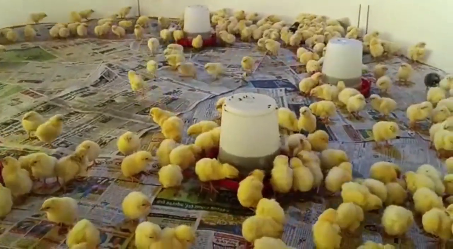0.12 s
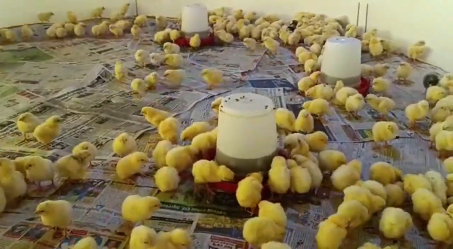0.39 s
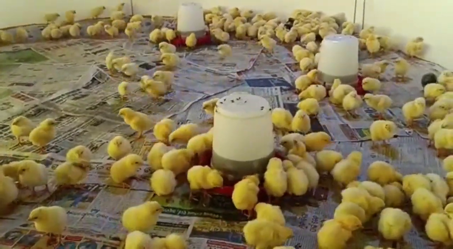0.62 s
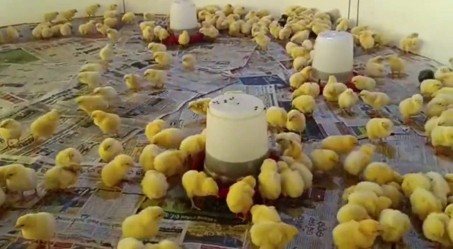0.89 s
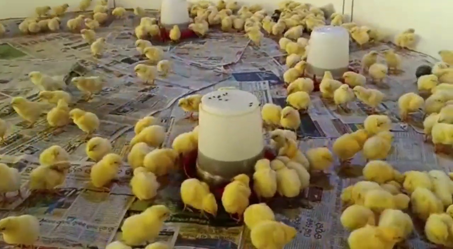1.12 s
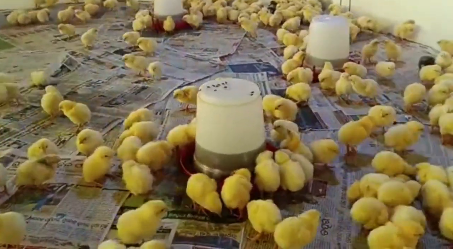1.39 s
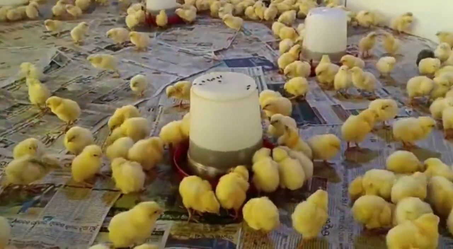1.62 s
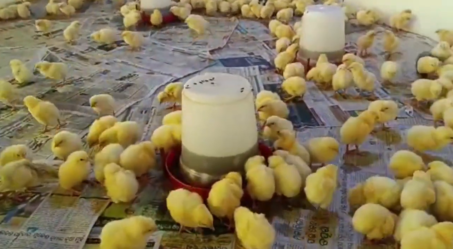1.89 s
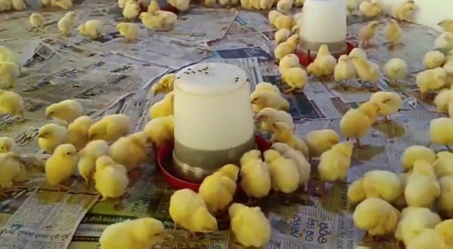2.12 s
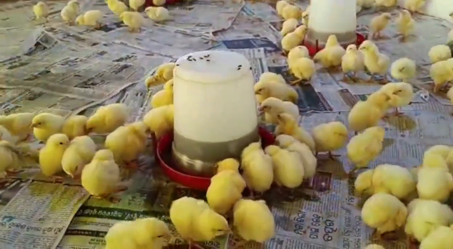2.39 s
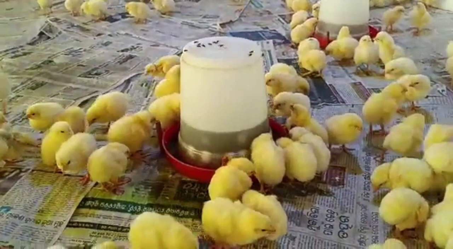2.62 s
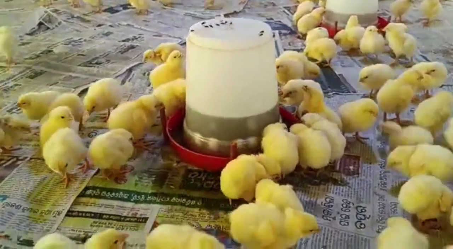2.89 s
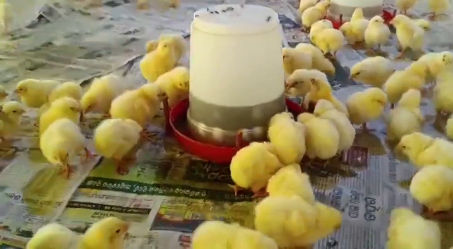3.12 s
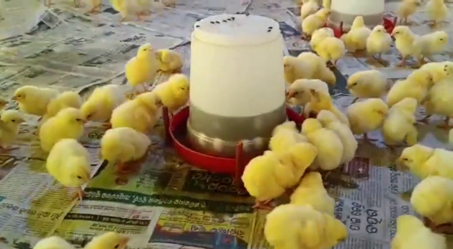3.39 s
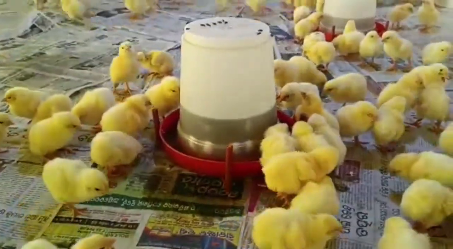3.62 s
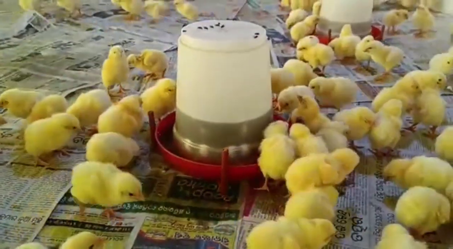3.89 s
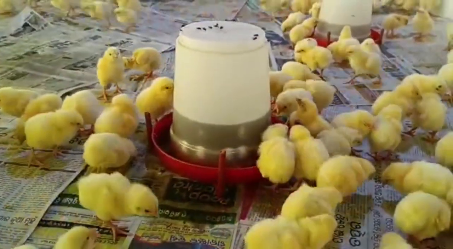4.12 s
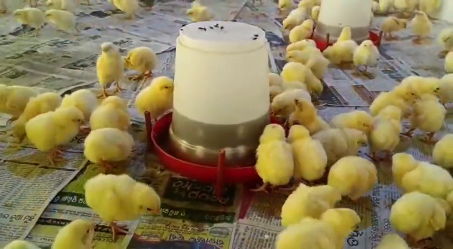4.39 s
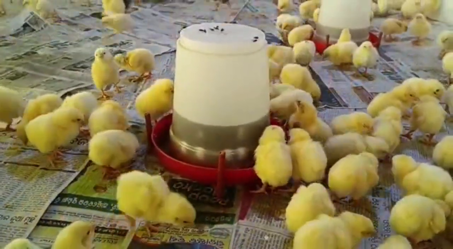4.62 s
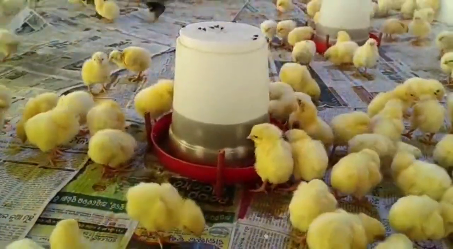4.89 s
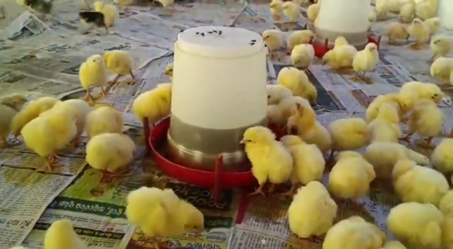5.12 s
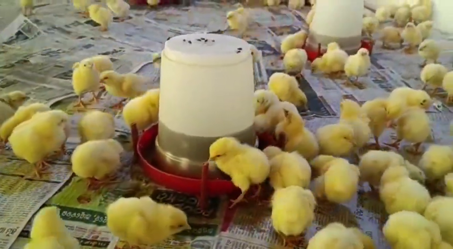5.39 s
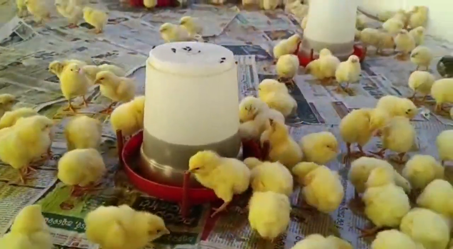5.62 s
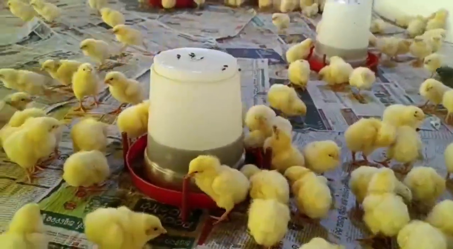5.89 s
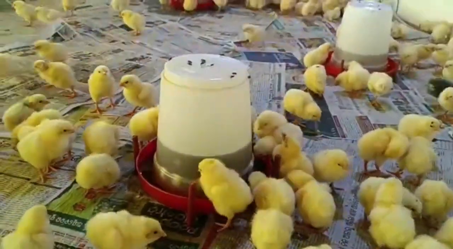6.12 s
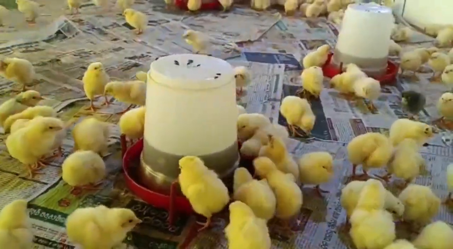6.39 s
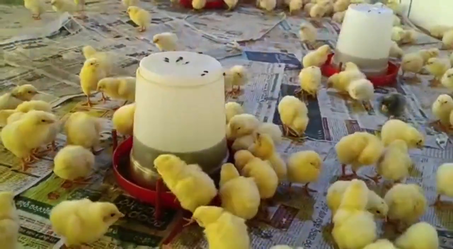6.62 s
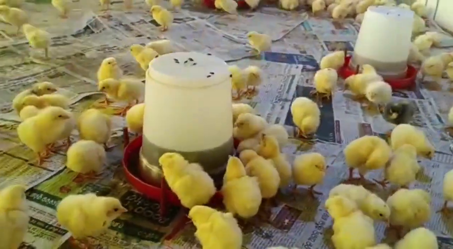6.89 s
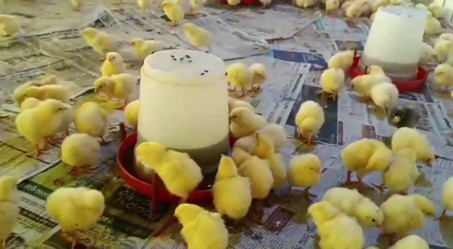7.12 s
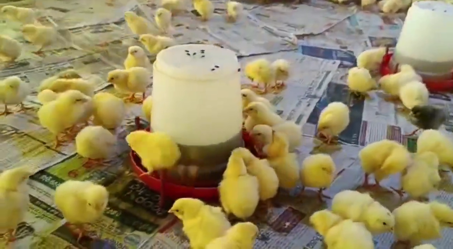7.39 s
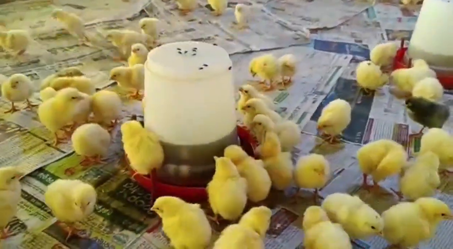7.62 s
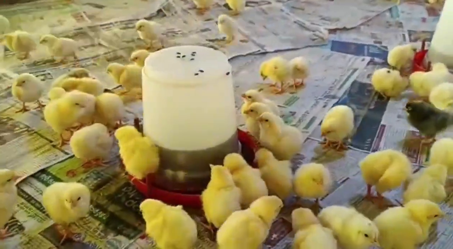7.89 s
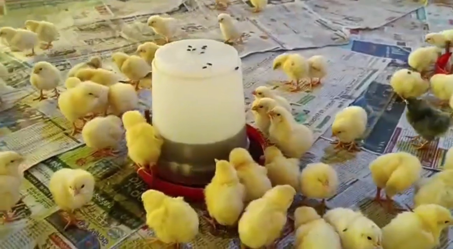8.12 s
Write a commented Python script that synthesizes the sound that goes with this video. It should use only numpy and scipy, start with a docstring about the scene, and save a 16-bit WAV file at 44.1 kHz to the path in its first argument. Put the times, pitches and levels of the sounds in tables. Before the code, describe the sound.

From 0 to about 8.3 seconds, hundreds of young chicks peep without pause in a bare shed. The far flock is a dense, bright, high whistling chorus, blurred by about half a second of reverberation, nearly constant in level. Over it, near birds pipe several times a second: tiny pure whistles, about a tenth of a second, gliding then falling steeply, some lower and shriller. A sharp loud chirp stands out left at 0.25; strong peeps follow around 0.6, 1.4, 2.0, 2.2, 3.6, 5.7 and 6.2, the last well to the right, with more left-side calls after 7.5. Feet patter in flickering papery bursts throughout. Small plastic beak taps come near 1.3, 2.7, 4.5, 6.3 and, clearest, 7.3. Faint low camera bumps occur near 1.75 and 3.5. The close stereo microphones favor peeps on the right; loud calls momentarily duck the rest. It stops mid-chorus.

```python
"""Hundreds of day-old chicks peep at once on a paper-covered floor in a bare shed.
Each peep is a near-sine whistle that glides slowly, then drops steeply, with weak harmonics; near birds
stand out of a chorus blurred by random echoes. Shaped noise and pulses give feet pattering on the paper,
damped sines give beak taps on a plastic feeder and soft bumps on the camera body.
The stereo microphones lean right for the peeps, and gain control ducks everything under loud birds."""
import sys
import numpy as np
from scipy import signal
from scipy.fft import rfft, irfft
from scipy.io import wavfile
from scipy.ndimage import uniform_filter1d, minimum_filter1d

SR = 44100
rng = np.random.default_rng(int(sys.argv[2]) if len(sys.argv) > 2 else 0)


def file_out(sig):
    """Save sig as 16-bit WAV at sys.argv[1]."""
    # one column per channel
    cols = np.atleast_2d(sig).T
    # limit, then scale
    lim = np.clip(cols, -1, 1)
    pcm = np.round(lim * 32767).astype(np.int16)
    wavfile.write(sys.argv[1], SR, pcm)


def convert_level_to_amplitude(level_db):
    """Map a level in decibels to its linear amplitude factor."""
    exponent = np.asarray(level_db, float) / 20
    return 10 ** exponent


N = 364266  # samples

# How strongly throat and beak pass each pitch. Each row: frequency in Hz, gain in dB.
BEAK_GAIN = [(2000, -9.5), (2600, -1.5), (3300, 0.5), (3900, 3.5), (4400, -1.5), (4900, -28), (5400, 5),
             (6300, 1), (7200, -12), (9000, -7.5), (11000, -6), (14000, -7)]


def evened(x):
    """Normalises by the root mean square, so that the mean power is 1."""
    return x / np.sqrt(np.mean(x ** 2) + 1e-20)


def read(points, hz):
    """Interpolates a spectrum along logarithmic frequency, as pitch is heard."""
    f, value = np.transpose(points)
    return np.interp(np.log(hz + 1), np.log(f + 1), value)


def add(mix, s, sound, pan_db=0, lag=0):
    """Places a source by interaural level and delay: the left port hears it lag samples later."""
    for side, shift, sign in ((mix[0], lag, 1), (mix[1], 0, -1)):
        at = round(s * SR) + int(shift)
        part = side[max(at, 0):max(at + len(sound), 0)]
        heard = sound[max(-at, 0):][:len(part)]
        part += convert_level_to_amplitude(sign * pan_db / 2) / np.sqrt(2) * heard


def peep(held, first_hz, knee_hz, drop, octave_db, luck):
    """Frequency-modulated harmonics through a resonant filter: a slow glide, then a steep fall."""
    t = np.arange(-held, drop, 1 / SR)  # zero where the fall begins
    falling = np.maximum(t, 0) / drop
    glide_hz = (knee_hz - first_hz) * np.minimum(t, 0) / held
    hz = knee_hz + glide_hz - 0.35 * knee_hz * falling ** 1.7
    hz = uniform_filter1d(hz, size=500, mode="nearest")  # the knee is round
    # the tiny voice is unsteady in pitch and force
    quiver = np.sin(2 * np.pi * ((25 + 50 * luck[2]) * t + luck[3]))
    quiver += np.sin(2 * np.pi * ((11 + 20 * luck[3]) * t + luck[2]))
    hz = hz * (1 + 0.0032 * quiver)
    phase = 2 * np.pi * (np.cumsum(hz) / SR + luck[0])
    strain_db = 7 * np.minimum(3 * falling, 1) - 4  # overtones grow as the note breaks off
    twelfth_db = -41 + 14 * luck[1] ** 2
    tone = convert_level_to_amplitude(read(BEAK_GAIN, hz) - read(BEAK_GAIN, knee_hz)) * np.sin(phase)
    tone += convert_level_to_amplitude(octave_db + strain_db + read(BEAK_GAIN, 2 * hz)) * np.sin(2 * phase)
    tone += convert_level_to_amplitude(twelfth_db + 2 * strain_db + read(BEAK_GAIN, 3 * hz)) * np.sin(3 * phase)
    rise = np.clip((t + held) / 0.014, 0, 1)
    fade = np.clip((drop - t) / (0.27 * drop), 0, 1)
    return tone * convert_level_to_amplitude(1.5 * quiver) * np.sin(np.pi / 2 * rise * fade) ** 2


def near_birds():
    """Direct sound localised by level and arrival time: the louder port hears a bird first."""
    # Peeps that sag, then drop. Each row: start of the drop in seconds, held time in seconds,
    # pitch before the drop in Hz, drop time in seconds, whistle level in dB, left minus right in dB.
    sagging = [(.06, 0.063, 4270, 0.066, -17.5, -2), (0.257, 0.021, 3490, 0.0069, -1.5, 10.5),
               (0.477, 0.078, 3960, .063, -19, -2.5), (.51, .05, 4140, .06, -15, 4),
               (.62, 0.027, 3690, 0.042, -9.5, 3.5), (.775, 0.065, 3560, 0.012, -12, 3.5),
               (.955, .122, 3904, 0.03, -14.5, -1), (.885, 0.044, 4050, .03, -18, 2),
               (2.065, 0.024, 4600, .06, -25, 3), (1.019, .039, 3970, 0.082, -17, -3),
               (1.245, 0.049, 4230, .051, -18, 0.5), (1.337, .031, 3500, 0.057, -16, 5),
               (1.867, .074, 3570, 0.021, -18, .5), (1.996, 0.14, 3728, 0.023, -8.5, 4.5),
               (2.397, 0.02, 3810, 0.037, -17, -6), (2.576, 0.053, 2890, 0.04, -16.5, -0.5),
               (2.665, .05, 3720, .04, -12, 1), (2.757, 0.063, 3890, 0.033, -11, 2.5),
               (2.808, .02, 4340, 0.089, -18, 11.5), (2.981, 0.027, 3800, 0.056, -13, 10),
               (3.098, .079, 2950, 0.058, -19, -4), (3.15, 0.02, 3950, 0.052, -15, 11.5),
               (3.173, 0.047, 3940, 0.076, -15.5, 4), (3.261, 0.049, 2950, 0.039, -22, 4.5),
               (3.265, .055, 4080, 0.05, -11, -2), (3.42, .06, 2950, .09, -21.5, -6.5),
               (3.583, 0.085, 3670, 0.027, -9.5, 3.5), (3.54, .09, 4160, 0.025, -18.5, -2),
               (3.67, 0.061, 3200, 0.061, -17.5, 2), (3.862, .04, 3886, 0.039, -16, -5.5),
               (4.011, .033, 4020, 0.11, -14.5, 4.5), (4.113, 0.13, 4110, .069, -16.5, -1),
               (4.26, 0.038, 4110, 0.039, -15, -0.5), (4.405, 0.026, 4110, .098, -11.5, 0),
               (4.633, .075, 4070, 0.038, -13, 3.5), (4.858, 0.14, 3705, 0.023, -21, -6),
               (4.903, 0.047, 3660, 0.019, -14, 3), (5.101, 0.16, 3710, 0.11, -16, 3.5),
               (5.5, 0.017, 2850, 0.064, -20.5, -3.5), (5.525, .119, 3827, 0.091, -16.5, -3.5),
               (5.567, .023, 4070, .039, -26, -1), (5.46, .012, 2900, 0.054, -17.5, -2.5),
               (5.569, 0.048, 3400, 0.059, -22, -1), (3.6, .02, 2900, 0.041, -25.5, -7),
               (5.896, 0.056, 2943, 0.06, -19.5, -3.5), (6.031, 0.057, 3590, 0.11, -19.5, 1.5),
               (6.344, 0.052, 3215, 0.024, -14, -9), (6.387, 0.12, 4000, 0.022, -14.5, 9.5),
               (6.689, 0.071, 3050, 0.041, -15, 3), (6.737, 0.061, 4190, .07, -20.5, 5.5),
               (7.002, .021, 3870, 0.066, -12, 4.5), (7.299, 0.055, 3880, 0.026, -15, 6),
               (7.44, .05, 4100, .05, -11, 4.5), (7.564, .035, 3050, 0.059, -22, 12),
               (7.573, .08, 3590, .03, -13.5, 10.5), (7.924, .085, 3857, 0.035, -14.5, 10),
               (8.13, .015, 3800, .05, -15, 3)]
    # Peeps that climb a little, then drop. Each row: start of the drop in seconds, held time in seconds,
    # pitch before the drop in Hz, drop time in seconds, whistle level in dB, left minus right in dB.
    arched = [(.195, 0.032, 3864, 0.09, -9.5, -4), (1.448, 0.073, 3960, 0.058, -7.5, 4),
              (2.08, .046, 3740, 0.062, -18.5, 5), (2.202, 0.025, 3904, 0.052, -8, -5),
              (2.444, 0.048, 4390, 0.069, -14.5, 2.5), (3.071, 0.094, 4215, 0.077, -16, -2),
              (3.475, .01, 2900, 0.039, -17.5, -2), (3.48, 0.011, 3600, 0.049, -17, -7),
              (4.08, 0.06, 4160, 0.026, -13.5, 2), (4.686, 0.073, 3824, 0.068, -18.5, -2),
              (4.943, .01, 4135, 0.094, -18, 6), (5.238, 0.037, 3934, 0.071, -19, -2),
              (5.736, 0.067, 4170, 0.057, -9, -5), (6.192, 0.078, 4400, 0.058, -10, -10),
              (6.332, 0.012, 3170, 0.047, -10.5, -7), (6.58, .08, 4176, 0.062, -10, -0.5),
              (6.857, 0.021, 3850, 0.047, -13, 10.5), (7.009, .101, 4270, 0.17, -19, 8.5),
              (7.018, 0.023, 3880, 0.12, -14.5, 1), (7.053, .021, 4390, 0.088, -18, 2.5),
              (7.223, 0.11, 3090, 0.054, -19.5, 4.5), (7.759, 0.055, 4985, 0.033, -37, -1)]
    # Low-voiced birds with a strong octave. Each row: start of the drop in seconds, held time in seconds,
    # pitch before the drop in Hz, drop time in seconds, octave level in dB before strain and beak gain.
    shrill = [(.056, .064, 3270, 0.1, -37), (0.765, 0.048, 3330, .077, -33.5),
              (1.739, .074, 3140, 0.035, -26.5), (2.783, .052, 3270, 0.065, -33),
              (3.04, 0.056, 3150, 0.045, -34.5), (2.245, .015, 3050, 0.053, -33),
              (5.169, 0.033, 3250, 0.05, -40), (5.56, 0.026, 3700, 0.063, -32.5),
              (3.24, 0.046, 3210, 0.066, -28.5), (3.69, 0.067, 3190, .055, -30.5),
              (3.993, 0.062, 3150, 0.03, -29), (4.229, .051, 3116, 0.051, -32),
              (4.295, 0.041, 3150, .087, -31), (6.601, 0.038, 3330, 0.052, -30),
              (7.891, 0.048, 3260, 0.051, -36)]
    # Octave of sagging and arched peeps, before strain and beak gain.
    # Each row: whistle pitch in Hz, octave level relative to the whistle in dB.
    octave_of_whistle = [(2900, -19), (3150, -51), (3500, -30), (4300, -25)]
    sag, shrill_sag, climb = -3300, -860, 1500  # Hz per second; climb holds at -15 dB
    shrill_whistle_db = 3.5  # whistle over the octave
    rows = [(*row, sag, read(octave_of_whistle, row[2])) for row in sagging]
    for row in arched:
        slope = climb * np.exp(0.1 * (row[4] + 15))  # louder ones climb faster
        rows.append((*row, slope, read(octave_of_whistle, row[2])))
    for row in shrill:
        rows.append((*row[:4], row[4] + shrill_whistle_db, 0, shrill_sag, -shrill_whistle_db))
    out = np.zeros((2, N))
    all_luck = rng.random((len(rows), 4))
    for (s, held, knee_hz, drop, db, pan_db, slope, octave_db), luck in zip(rows, all_luck):
        sound = peep(held, knee_hz - slope * held, knee_hz, drop, octave_db, luck)
        add(out, s - held, convert_level_to_amplitude(db) * sound, pan_db, -pan_db)
    return out


def chorus():
    """Superposition of many incoherent sources with random timing, pitch, level and bearing."""
    per_s, lead_s = 190, 0.3  # peeps per second; seconds by which the chorus starts early
    count = int(per_s * (N / SR + lead_s))
    uniform, normal = rng.random((count, 8)), rng.standard_normal((count, 5))
    out = np.zeros((2, N))
    for k in range(count):
        long, slow, jitter, bearing, *luck = uniform[k]
        pitch, glide, size, pan, facing = normal[k]
        # few birds reach high
        spread = max(pitch, -1.7) if pitch < 0 else 1.9 * np.tanh(pitch / 2)
        knee_hz = 3763 + 470 * spread
        held, drop = 0.015 + 0.06 * long, 0.035 + 0.075 * slow
        first_hz = knee_hz + held * (1500 + 2000 * glide)
        octave_db = -25.5 + 9.55 * min(facing, 1.1)  # depends on how the bird faces
        sound = peep(held, first_hz, knee_hz, drop, octave_db, luck)
        sound = convert_level_to_amplitude(3.4 * min(size, 1.1) + read(BEAK_GAIN, knee_hz)) * sound
        add(out, (k + 6 * jitter) / per_s - lead_s, sound, 4 * pan, 30 * (bearing - 0.5))
    return out


def shed(x):
    """Reverberation as exponentially decaying echoes of random sign, independent at each port."""
    t60, length = 0.51, SR // 2  # seconds to fall 60 dB; samples kept
    taps = np.zeros((2, length))
    at = np.arange(200, length - 20, 20)
    at = at + rng.integers(0, 20, (2, len(at)))
    np.put_along_axis(taps, at, rng.choice([-1., 1.], at.shape), 1)
    taps *= convert_level_to_amplitude(-60 * np.arange(length) / SR / t60)
    return signal.fftconvolve(x, taps / np.linalg.norm(taps[0]), axes=1)[:, :N]


def rustle():
    """Amplitude-modulated noise: a wash plus random footfalls, filtered, partly coherent between ports."""
    # Colour of shed air and shuffling on paper. Each row: frequency in Hz, gain in dB.
    paper_colour = [(20, -74), (40, -7.5), (125, 3.5), (450, 7), (900, 5.5), (2000, 10), (5000, 15),
                    (7500, -15), (9500, -12), (15500, -5.5)]
    # Course of the shuffling. Each row: time in seconds, level in dB before colouring.
    shuffling = [(0, -45.5), (1.15, -50), (1.2, -45.5), (2.69, -46.5), (2.83, -51), (2.85, -42.5),
                 (3.01, -52), (3.54, -45.5), (3.68, -53.5), (3.84, -45.5), (4.28, -51.5), (4.3, -46),
                 (7.2, -45.5), (7.34, -44.5), (7.45, -46), (8.26, -45)]
    # Coherence of the ports. Each row: frequency in Hz, left-right likeness from 0 to 1.
    likeness = [(30, 0.17), (150, 0.91), (550, 0.81), (1650, 0), (5000, 0.072), (9000, 1), (15000, 0)]
    footfalls = rng.random(N) < 690 / SR  # 690 a second on average
    size = convert_level_to_amplitude(4.2 * np.minimum(rng.exponential(1, N), 5)) * footfalls
    # scuff with a short tail
    step = uniform_filter1d(size, size=60) + signal.lfilter([0.004], [1, -0.996], size)
    busy = convert_level_to_amplitude(np.interp(np.arange(N) / SR, *np.transpose(shuffling)))
    flicker = uniform_filter1d(rng.standard_normal(N), size=2500)
    busy *= convert_level_to_amplitude(2.12 * evened(flicker))  # in short bursts
    noise = rng.standard_normal((2, N))
    left, other = rfft(busy * (1 + 0.58 * evened(step)) * noise)
    hz = np.fft.rfftfreq(N, 1 / SR)
    same = np.clip(read(likeness, hz), -1, 1)
    right = same * left + np.sqrt(1 - same ** 2) * other
    return irfft(convert_level_to_amplitude(read(paper_colour, hz)) * np.array([left, right]), N)


def knocks():
    """Damped modes after an impact: plastic rings inharmonically for milliseconds, bumps are low and longer."""
    # Beak taps on the feeder. Each row: start in seconds, main mode's level in dB before decay,
    # its frequency in Hz, left minus right in dB.
    feeder_taps = [(1.266, -29, 1640, -3.5), (2.496, -37, 1460, 31), (2.67, -27, 1370, 13),
                   (2.84, -35.5, 1550, -15), (4.303, -36, 476, -10), (4.488, -31.5, 473, -8),
                   (4.716, -38, 1540, -29), (6.259, -26.5, 1300, -6), (7.192, -28, 373, -6),
                   (7.324, -18, 790, 3.5)]
    # Soft bumps on the camera body. Each row: start in seconds, level in dB before decay, frequency in Hz.
    body_bumps = [(1.612, -44, 124), (1.755, -31, 127), (3.094, -43, 155), (3.465, -36, 129),
                  (4.716, -45, 102), (6.546, -43, 91.5)]
    out, t = np.zeros((2, N)), np.arange(0, 0.2, 1 / SR)
    for s, db, hz, pan_db in feeder_taps:
        ring = np.sin(2 * np.pi * hz * t)
        ring += 0.97 * np.sin(2 * np.pi * 1.635 * hz * t)
        ring += 0.5 * np.sin(2 * np.pi * 0.44 * hz * t)
        ring += 0.44 * uniform_filter1d(rng.standard_normal(len(t)), size=10)  # dull contact noise
        decay = convert_level_to_amplitude(db - 60 * t / 0.02)  # 60 dB in 20 ms
        add(out, s, decay * ring * np.minimum(t / 0.0011, 1), pan_db)
    for s, db, hz in body_bumps:
        decay = convert_level_to_amplitude(db - 60 * t / 0.13)  # 60 dB in 130 ms
        add(out, s, decay * np.sin(2 * np.pi * hz * t) * np.minimum(t / 0.0022, 1))
    return out


def scene():
    """Direct-to-reverberant ratio sets distance: near birds mostly dry, the chorus half drowned in the shed."""
    # The chorus swells and thins. Each row: time in seconds, level in dB.
    swell = [(0, -18.5), (1.2, -18.5), (2.4, -18), (3.5, -19), (4.6, -18.5), (5.8, -19), (7, -19),
             (8.26, -17.5)]
    near, far = near_birds(), chorus()
    near = near + convert_level_to_amplitude(-11.5) * shed(near)
    far = evened(far + convert_level_to_amplitude(-2) * shed(far))
    far = far * convert_level_to_amplitude(np.interp(np.arange(N) / SR, *np.transpose(swell)))
    return near + far + rustle() + knocks()


def roll_off(x):
    """The treble ends steeply here."""
    return signal.sosfilt(signal.butter(12, 15800, fs=SR, output="sos"), x)


def record(dry):
    """Compression by level feedforward: the right port favours the peeps, loud birds duck all."""
    # Unequal response of the microphone pair. Each row: frequency in Hz, left minus right in dB.
    port_tilt = [(40, -2), (120, -0.5), (600, 0), (1650, -4.5), (4970, -8.5), (7000, -1), (9000, 6),
                 (15000, 7.5)]
    tilt_db = read(port_tilt, np.fft.rfftfreq(N, 1 / SR)) / 2
    ports = irfft(rfft(dry) * convert_level_to_amplitude(np.array([tilt_db, -tilt_db])), N)
    power = uniform_filter1d((ports ** 2).mean(0), size=500)
    power_db = 10 * np.log10(abs(power) + 1e-12)
    fall = np.arange(N) * 60. / SR  # the held level recovers 60 dB a second
    held_db = np.maximum.accumulate(power_db + fall) - fall
    over_db = np.maximum(held_db + 13.0, 0)  # threshold at -13 dB
    ducked = ports / convert_level_to_amplitude(0.8 * uniform_filter1d(over_db, size=300))
    # a limiter catches the last peaks
    room_left = 0.86 / np.maximum(abs(ducked).max(0), 0.86)
    limit = uniform_filter1d(minimum_filter1d(room_left, size=200), size=200)
    return roll_off(ducked * limit)


dry = scene()
out = record(dry)
file_out(out)
```